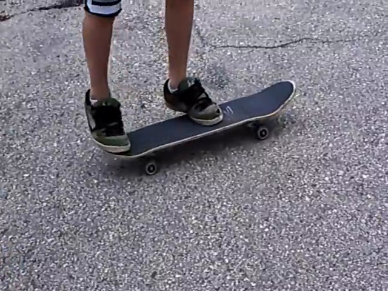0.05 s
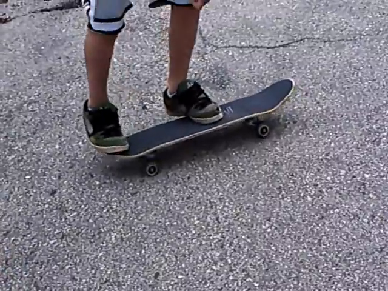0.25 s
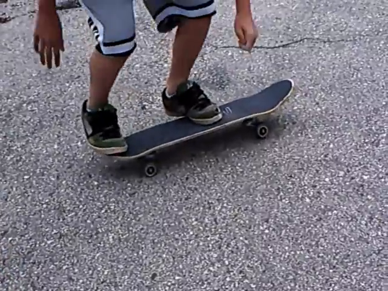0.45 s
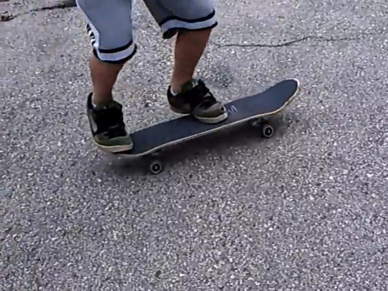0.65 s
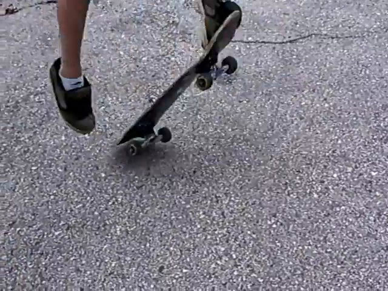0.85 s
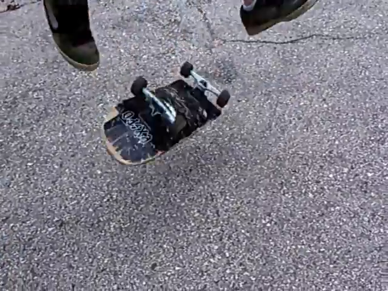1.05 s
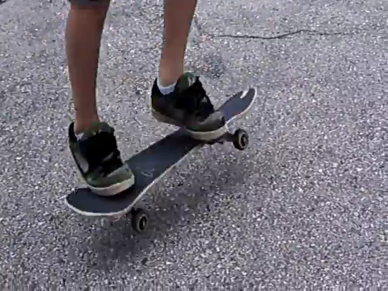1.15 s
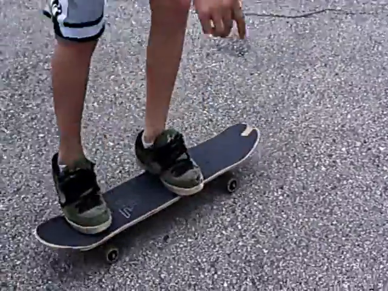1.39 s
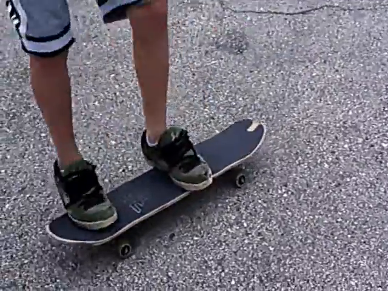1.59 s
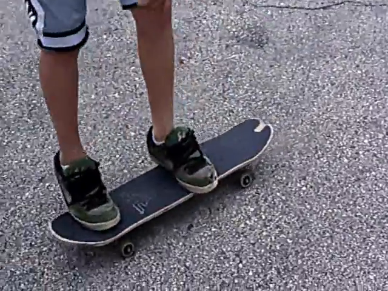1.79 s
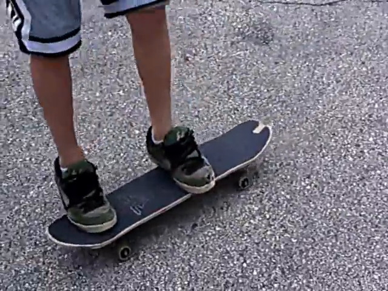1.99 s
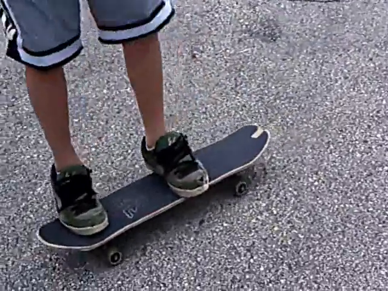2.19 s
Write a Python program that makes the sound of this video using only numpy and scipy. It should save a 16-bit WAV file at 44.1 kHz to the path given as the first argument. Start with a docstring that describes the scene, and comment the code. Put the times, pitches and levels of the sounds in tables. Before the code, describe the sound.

A skateboard on asphalt creaks quietly, its tail knocks the ground, soles scuff the deck, and the wheels slam down in a clipped, clattering burst; the echo fades into light gritty rolling, close-miked outdoors with faint distant rumble.

```python
"""Skateboard flip trick on asphalt

Outdoors and close: trucks creak as the rider crouches, the tail pops, shoes catch the spinning deck, wheels slam down.
Clicks ring the modes of deck and trucks; shaped noise makes cracks, scuffs, rubs, rolling and rumble.
Wavering sines hum far away, the surroundings echo the board, and the landing overloads the microphone.
"""
import sys
import numpy as np
from scipy import signal
from scipy.fft import rfft, irfft, next_fast_len
from scipy.io import wavfile

SR = 44100
rng = np.random.default_rng(int(sys.argv[2]) if len(sys.argv) > 2 else 0)


def dump(signal):
    """Clip the signal to [-1, 1] and save it as 16-bit WAV at the path in sys.argv[1]."""
    limited = np.clip(np.atleast_2d(signal).T, -1, 1)
    pcm = np.round(limited * 32767).astype(np.int16)
    wavfile.write(sys.argv[1], SR, pcm)


N = 98739
T = np.arange(N) / SR  # time in seconds


def amp(db):
    """Decibels to gain."""
    return 10 ** (np.asarray(db) / 20)


def unit(x):
    """Scale to rms 1."""
    return x / np.sqrt(np.mean(x ** 2) + 1e-20)


def level(rows):
    """Gain over time, interpolated in dB between (seconds, dB) rows."""
    return amp(np.interp(T, *np.transpose(rows)))


def colour(x, points):
    """Causal minimum-phase filter through (Hz, dB) points, made by folding the cepstrum."""
    size = next_fast_len(2 * N)
    size += size % 2  # even length
    hz, db = np.transpose(points)
    bins_hz = np.maximum(np.arange(size // 2 + 1) * SR / size, 1)
    gain = amp(np.interp(np.log(bins_hz), np.log(hz), db))
    cepstrum = irfft(np.log(gain))
    cepstrum[1:size // 2] *= 2
    cepstrum[size // 2 + 1:] = 0
    response = np.exp(rfft(cepstrum))
    return irfft(rfft(x, size) * response)[:N]


def noise(points):
    """Coloured noise of rms 1."""
    return unit(colour(rng.standard_normal(N), points))


def drift(rate):
    """Slow random curve of rms 1, with `rate` new points a second."""
    return unit(np.interp(T * rate, np.arange(N), rng.standard_normal(N)))


def dying(start, t60):
    """Sudden start, then an exponential decay of 60 dB in t60 seconds."""
    return (T >= start) * amp(-60 * np.maximum(T - start, 0) / t60)


def clicks(times, db):
    """One impulse at each time."""
    out = np.zeros(N)
    index = np.clip((np.asarray(times) * SR).astype(int), 0, N - 1)
    np.add.at(out, index, amp(db))
    return out


def ring(x, hz, t60):
    """One resonant mode: a unit click rings a decaying sine of starting height 1."""
    radius = amp(-60 / (t60 * SR))
    angle = 2 * np.pi * hz / SR
    poles = [1, -2 * radius * np.cos(angle), radius * radius]
    return signal.lfilter([0, np.sin(angle)], poles, x + 1e-18)  # the offset avoids denormals


def high_pass(x, hz):
    """Second-order low cut."""
    return signal.sosfilt(signal.butter(2, hz, "high", fs=SR, output="sos"), x)


# Colour of the distant outdoor rumble. Each row: frequency in Hz, level in dB.
RUMBLE_COLOUR = [(15, -24.5), (25, -1), (96, -2), (119, -2.5), (152, -3.5), (173, -5), (227, -5.5),
                 (421, -19), (919, -18), (2420, -40), (4260, -34.5), (5580, -41), (15500, -42)]
RUMBLE_DB = -41


def outdoor_rumble():
    """Steady noise with most of its weight in the lows."""
    return amp(RUMBLE_DB) * noise(RUMBLE_COLOUR)


# Loudness path of the distant hum. Each row: time in seconds, level in dB.
HUM_LEVEL = [(0, -47.5), (.8, -42), (1.3, -46.5), (2.24, -48.5)]
HUM_HZ, HUM_UPPER_HZ, HUM_UPPER_DB = 146, 220, -14
HUM_WAVER, HUM_SWELL_DB = 0.014, 0.89  # rms pitch waver as a fraction, rms level waver in dB


def distant_hum():
    """A distant machine: two sines waver together in pitch, with a small random swell."""
    clock = 2 * np.pi * np.cumsum(1 + HUM_WAVER * drift(14)) / SR  # phase of a wavering 1 Hz
    low = np.sin(HUM_HZ * clock)
    upper = amp(HUM_UPPER_DB) * np.sin(HUM_UPPER_HZ * clock)
    return level(HUM_LEVEL) * unit(low + upper) * amp(HUM_SWELL_DB * drift(13))


# Colour of the scattered echoes. Each row: frequency in Hz, level in dB.
SCATTER_COLOUR = [(100, -17.5), (350, 0), (600, -4.5), (1000, -3), (2000, -8.5), (4000, -4.5), (7000, -5.5),
                  (11000, 1), (15000, -5.5)]
SCATTER_DB, SCATTER_RISE_DB = -18, 9.5
SCATTER_PEAK_S, SCATTER_T60_S = 0.071, 0.27
FAR_DB, FAR_T60_S = -20.5, 1  # level relative to the near echoes


def surroundings(x):
    """Scattered echoes swell for a moment and die, leaving a faint far tail."""
    rise = amp(SCATTER_RISE_DB * np.minimum(T / SCATTER_PEAK_S - 1, 0))
    fall = amp(-60 * np.maximum(T - SCATTER_PEAK_S, 0) / SCATTER_T60_S)
    far = amp(FAR_DB) * dying(SCATTER_PEAK_S, FAR_T60_S)
    response = rng.standard_normal(N) * (rise * fall + far)
    response = colour(response / np.sqrt(np.sum(response ** 2)), SCATTER_COLOUR)  # energy 1 before colour
    return amp(SCATTER_DB) * signal.fftconvolve(x, response)[:N]


# Distinct echoes off nearby walls. Each row: delay in seconds, level in dB before colouring.
SLAPS = [(.044, -25), (0.056, -29.5), (.073, -24)]
# Colour of those echoes. Each row: frequency in Hz, level in dB.
SLAP_COLOUR = [(200, -12), (600, -2.5), (1000, -6.5), (2000, -6.5), (4000, -10.5), (15000, -3)]
SLAP_SMEAR_S = .012  # t60 of each echo's noise burst


def wall_slaps(x):
    """A few dull wall echoes, each smeared by a short noise burst."""
    bursts = sum(amp(db) * dying(delay, SLAP_SMEAR_S) for delay, db in SLAPS)
    bursts = bursts / np.sqrt(np.sum(dying(0, SLAP_SMEAR_S) ** 2))
    response = colour(bursts * rng.standard_normal(N), SLAP_COLOUR)
    return signal.fftconvolve(x, response)[:N]


# Loudness path of wheels and soles on rough ground. Each row: time in seconds, level in dB.
ROLL_LEVEL = [(0, -56.5), (.25, -53.5), (.4, -49.5), (.55, -50.5), (.85, -56), (1.05, -50), (1.25, -44),
              (1.38, -48.5), (1.7, -46), (1.95, -49.5), (2.24, -51.5)]
# Colour of that grinding. Each row: frequency in Hz, level in dB.
ROLL_COLOUR = [(150, -17.5), (400, -5), (900, 0), (1500, -9), (2800, -22.5), (4500, -25), (9000, -26),
               (15000, -25)]
ROLL_ROUGH_DB = 2.5  # rms unevenness


def rolling():
    """Uneven grinding on the asphalt: dark noise with a fast random flutter in level."""
    grinding = noise(ROLL_COLOUR) * amp(ROLL_ROUGH_DB * drift(120))
    return level(ROLL_LEVEL) * unit(grinding)


# Metal parts of the trucks rub. Each row: start in seconds, length in seconds, level in dB.
RUBS = [(0.168, 0.016, -40), (1.074, .028, -47), (1.078, 0.0034, -44.5), (1.4096, 0.0021, -31),
        (1.4669, 0.0024, 5.5), (2.214, 0.0029, -47.5)]
# Colour of the metal. Each row: frequency in Hz, level in dB.
METAL_COLOUR = [(1500, -62.5), (2600, -12.5), (3500, -9), (4200, 4.5), (5400, -19.5), (6800, 0),
                (8500, -28), (13000, -24.5), (15400, -9.5)]
RUB_FADE_S = 0.0011  # time constant
BEARING_DB, BEARING_START_S = -62, 1.97


def metal():
    """Short bright noise rubs of the hardware, and the bearings' whisper as the board rolls away."""
    envelope = amp(BEARING_DB) * np.clip((T - BEARING_START_S) * 10, 0, 1)  # 0.1 s fade-in
    for start, length, db in RUBS:
        past_edge = np.maximum(np.abs(T - start - length / 2) - length / 2, 0)
        envelope = envelope + amp(db) * np.exp(-past_edge / RUB_FADE_S) * (T >= start)
    return noise(METAL_COLOUR) * envelope


# Shoes scuff the grip tape. Each row: start in seconds, length in seconds, level in dB.
SCUFFS = [(0.377, 0.041, -44), (.428, 0.03, -39.5), (0.967, 0.0096, -40.5), (0.998, 0.033, -41),
          (1.064, .04, -43.5), (1.142, 0.018, -24), (1.156, 0.019, -29.5), (1.17, 0.019, -28.5),
          (1.182, 0.045, -35.5)]
# Colour of the scuffs. Each row: frequency in Hz, level in dB.
SCUFF_COLOUR = [(200, -16.5), (500, -7.5), (750, 5), (1050, 1), (1400, -11.5), (2100, -10.5), (3000, -28.5),
                (4300, -25), (8000, -26), (15000, -21.5)]
SCUFF_GRAIN_DB = 2.6  # rms flutter


def scuffs():
    """Short grainy swells of sole against deck: fluttering noise under half-sine envelopes."""
    swell = sum(amp(db) * np.sin(np.pi * np.clip((T - start) / length, 0, 1))
                for start, length, db in SCUFFS)
    return swell * unit(noise(SCUFF_COLOUR) * amp(SCUFF_GRAIN_DB * drift(470)))


# Crack of a hard contact on grit, also the colour of creak snaps. Each row: frequency in Hz, level in dB.
CRACK_COLOUR = [(100, -19), (300, -8.5), (800, 8.5), (1500, 7), (2300, 2), (3000, -9.5), (4200, 2),
                (5500, -11.5), (8000, -4.5), (15000, -8)]
# The trucks creak under shifting weight. Each row: start in seconds, level in dB.
CREAKS = [(0.0721, -44), (0.2801, -30), (0.4375, -47), (0.4577, -25.5), (.598, -42.5)]
# Modes a creak sets ringing. Each row: frequency in Hz, level in dB, t60 in seconds.
CREAK_MODES = [(1072, -3, 0.031), (1810, -0.5, 0.018), (1990, -15, 0.022), (4840, -15, 0.0085),
               (9120, -10, 0.015), (12850, -11, .02)]
SNAP_DB, SNAP_T60_S = -14.5, .03  # level relative to the creak


def creaks():
    """Each creak is one slip: a small noise snap and a brief ring."""
    times, levels_db = np.transpose(CREAKS)
    snap = sum(amp(db + SNAP_DB) * dying(start, SNAP_T60_S) for start, db in CREAKS)
    slips = clicks(times, levels_db)
    ringing = sum(amp(db) * ring(slips, hz, t60) for hz, db, t60 in CREAK_MODES)
    return snap * noise(CRACK_COLOUR) + ringing


# The rider's weight bears on the deck. Each row: time in seconds, thud level in dB before the low cut, ring level in dB.
LOADS = [(1.46, -10.5, -32), (1.480, -6, -14), (1.520, -34, -14), (1.540, -36, -14.5), (1.5551, -38, -18)]
THUD_HZ, THUD_T60_S, THUD_LOW_CUT_HZ = 141.2, 0.07, 147
FLEX_HZ, FLEX_T60_S = 343.8, 0.13


def loads():
    """The rider's weight makes a dull thud and sets the flexed deck ringing."""
    times, thud_db, ring_db = np.transpose(LOADS)
    thud = ring(clicks(times, thud_db), THUD_HZ, THUD_T60_S)
    flex = ring(clicks(times, ring_db), FLEX_HZ, FLEX_T60_S)
    return high_pass(thud, THUD_LOW_CUT_HZ) + flex


# Blows on the board, both levels before filtering.
# Each row: time in seconds, wood level in dB, crack level in dB, crack t60 in seconds.
BLOWS = [(.7292, -37, -35, 0.048), (0.738, -43, -40, 0.035), (0.957, -42, -37.5, 0.042),
         (0.9677, -33.5, -36, 0.035), (0.9987, -38.5, -41, 0.039), (1.1055, -12.5, -15.5, 0.088),
         (1.130, -25.5, -26.5, 0.053), (1.3988, -29.5, -34.5, .05), (1.411, -25, -22.5, 0.044),
         (1.4244, -22, -29.5, 0.11), (1.457, -18, -21, 0.025), (1.4602, 8.5, 1, 0.024),
         (1.4668, 3, 4, 0.026), (1.4785, 4, -2, 0.062), (1.482, 0, -6.5, 0.022), (1.488, -10.5, -17, 0.039),
         (1.521, -25.5, -23.5, 0.096), (1.538, -17.5, -23, 0.086), (1.578, -22, -29, 0.038),
         (1.6867, -37.5, -37.5, 0.049), (1.794, -38, -39, 0.025)]
# Modes of the wooden deck. Each row: frequency in Hz, level in dB before filtering, t60 in seconds.
DECK_MODES = [(234, -22.5, 0.1), (298.4, -18, 0.17), (549, -18, 0.039), (584.5, -10, 0.067),
              (687, -6, 0.069), (784.4, -5.5, 0.02), (895, -11.5, 0.055), (959, -9.5, 0.081),
              (1001, -8.5, 0.07), (1080, -14, 0.032), (1320, -23.5, .04), (1522, -25.5, 0.052),
              (1890, -15, .03), (2401, -17.5, 0.048), (2576, -26, 0.048)]
MODE_SPREAD_DB = 4.5  # random spread of each mode from blow to blow
CONTACT_HZ, DECK_LOW_CUT_HZ = 5000, 174


def blows():
    """Each blow rings the deck's modes and throws off a short gritty crack."""
    times, wood_db, _, _ = np.transpose(BLOWS)
    spread_db = MODE_SPREAD_DB * rng.standard_normal((len(times), len(DECK_MODES)))
    wood = np.zeros(N)
    for k, (hz, db, t60) in enumerate(DECK_MODES):
        wood += ring(clicks(times, wood_db + db + spread_db[:, k]), hz, t60)
    wood = signal.lfilter(*signal.butter(1, CONTACT_HZ, fs=SR), wood)  # contact softens the treble
    wood = high_pass(wood, DECK_LOW_CUT_HZ)
    power = sum((amp(db) * dying(start, t60)) ** 2 for start, _, db, t60 in BLOWS)
    crack = colour(np.sqrt(power) * rng.standard_normal(N), CRACK_COLOUR)
    return wood + crack


METAL_ECHO_DB = -8.5  # the metal parts sound fainter in the echoes than the wood


def scene():
    """The background, the board with its hardware, and their echoes."""
    background = outdoor_rumble() + distant_hum()
    hardware = metal()
    board = scuffs() + creaks() + loads() + blows()
    carried = board + amp(METAL_ECHO_DB) * hardware
    echoes = surroundings(carried) + wall_slaps(carried)
    return (background + echoes + rolling() + hardware + board)[None]


# Ripples in the microphone's treble. Each row: frequency in Hz, level in dB.
MIC_COLOUR = [(20, -0.5), (7200, 0.5), (8300, -7.5), (10000, 4), (11000, 4.5), (12000, 3.5), (13900, -10),
              (15200, -2.5)]
OVERLOAD = 0.95  # clipping level, full scale 1
NOTCH_HZ, NOTCH_Q, CUTOFF_HZ = 11010, 9.5, 15800


def record(dry):
    """Microphone colour, hard overload, a narrow treble notch and a steep treble cut."""
    clipped = np.clip(colour(dry[0], MIC_COLOUR), -OVERLOAD, OVERLOAD)
    notched = signal.lfilter(*signal.iirnotch(NOTCH_HZ, NOTCH_Q, fs=SR), clipped)
    steep_cut = signal.ellip(10, .1, 80, CUTOFF_HZ, fs=SR, output="sos")  # ripple and stopband in dB
    return signal.sosfilt(steep_cut, notched)[None]


dry = scene()
out = record(dry)
dump(out)
```